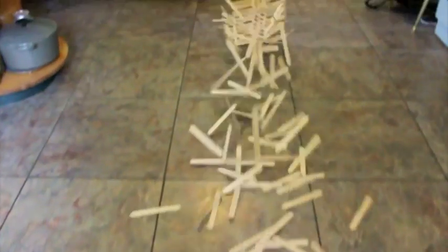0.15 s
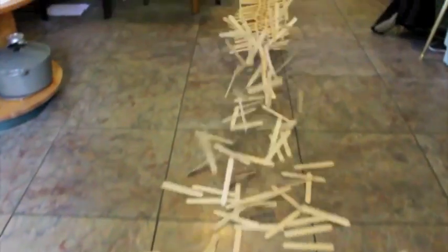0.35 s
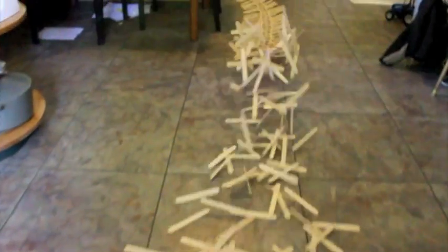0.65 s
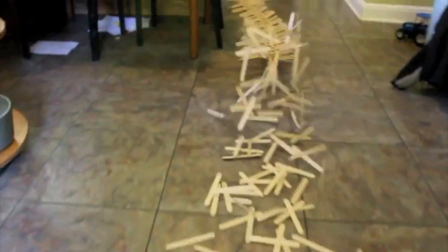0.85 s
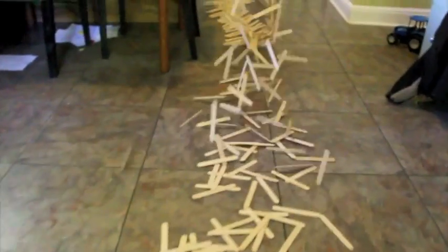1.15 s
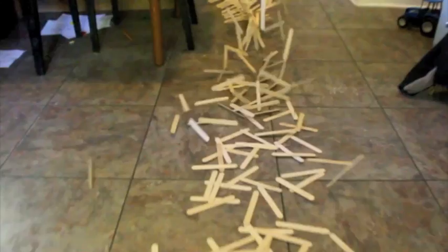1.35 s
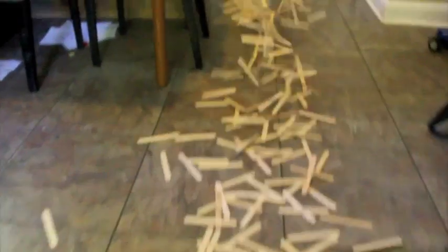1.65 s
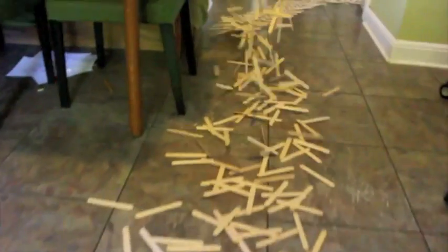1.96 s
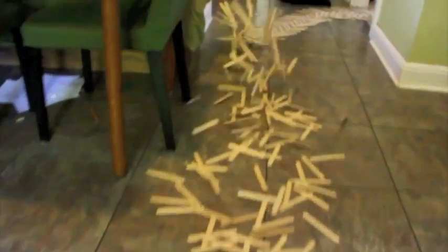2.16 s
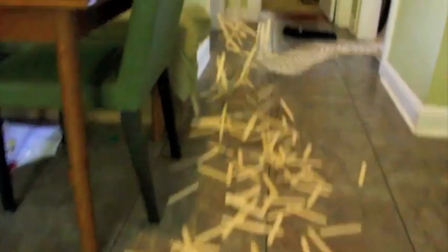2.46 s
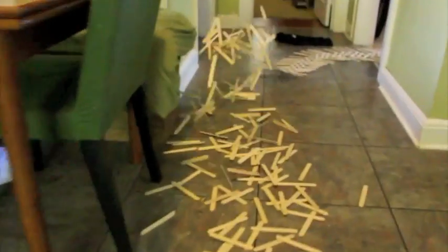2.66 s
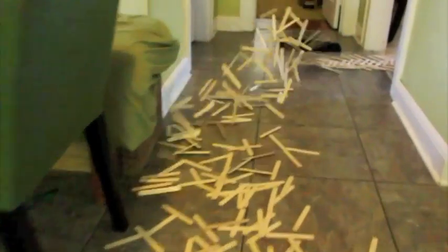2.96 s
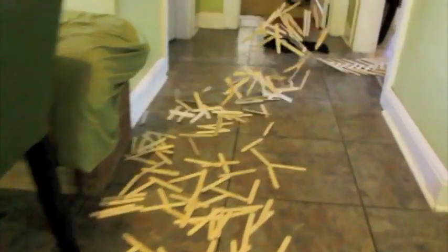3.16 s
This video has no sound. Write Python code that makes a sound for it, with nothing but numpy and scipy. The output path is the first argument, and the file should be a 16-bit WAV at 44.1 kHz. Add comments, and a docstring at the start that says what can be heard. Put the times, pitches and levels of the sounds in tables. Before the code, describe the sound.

A chain of thin wooden sticks bursts apart, rattling sharply across an indoor tiled floor

```python
"""Wooden sticks clattering on tile

A woven chain of wooden craft sticks springs apart along a tiled floor; the sticks rain down and clatter.
Flurries of bright wood-on-tile ticks and duller stick-on-stick knocks are filtered random contacts;
the loudest landings and flat slaps are placed one by one as short swelling rings.
A hard room blurs them all, and the walking camera picks up soft low thuds, made of wavering sines."""
import sys
import numpy as np
from scipy import signal
from scipy.fft import rfft, irfft, next_fast_len
from scipy.io import wavfile
from scipy.ndimage import map_coordinates

SR = 44100
rng = np.random.default_rng(int(sys.argv[2]) if len(sys.argv) > 2 else 0)


def materialize(psi):
    """Save the field psi as 16-bit PCM at rate SR to the path in sys.argv[1].

    A 1-D psi becomes a single channel; in a 2-D psi each row is a channel.
    """
    bounded = np.clip(np.atleast_2d(psi).T, -1, 1)
    quanta = np.round(bounded * 32767).astype(np.int16)
    wavfile.write(sys.argv[1], SR, quanta)


N = 146412  # length in samples


def amp(db):
    """Turn dB into an amplitude gain."""
    return 10 ** (np.asarray(db) / 20)


def unit(x):
    """Scale to rms 1."""
    return x / np.sqrt(np.mean(x ** 2) + 1e-20)


def along(points, hz):
    """Read (Hz, value) points at the frequencies hz, on a log axis."""
    point_hz, value = np.transpose(points)
    return np.interp(np.log(hz + 1), np.log(point_hz + 1), value)


def curve(rows):
    """Draw straight lines through (s, value) rows, one value per sample."""
    s, value = np.transpose(rows)
    return np.interp(np.arange(N) / SR, s, value)


def wobble(rate):
    """A smooth random curve with `rate` random knots a second."""
    knots = rng.standard_normal(400)
    return map_coordinates(knots, [np.arange(N) * rate / SR])


def coloured(x, spectrum):
    """Filter x to the given (Hz, dB) gain with minimum phase, so nothing sounds ahead of a contact."""
    m = next_fast_len(N + SR // 2) // 2 * 2
    gain = amp(along(spectrum, np.fft.rfftfreq(m, 1 / SR)))
    # folding the cepstrum onto positive time makes the filter causal
    cepstrum = irfft(np.log(gain), m)
    cepstrum[1:m // 2] *= 2
    cepstrum[m // 2 + 1:] = 0
    response = np.exp(rfft(cepstrum))
    return irfft(rfft(x, m) * response, m)[:N]


def place(s, waves):
    """Add one row of waves at each start time in s (a column, in seconds)."""
    size = waves.shape[1]
    at = np.round(s * SR).astype(int).clip(0, N) + np.arange(size)
    return np.bincount(at.ravel(), waves.ravel(), N + size + 1)[:N]


def rings(s, db, hz, life_s, rise_s, size):
    """One damped sine per contact: a quick rise, then exponential decay."""
    t = np.arange(size) / SR
    decay = np.exp(-t / life_s[:, None])
    rise = 1 - np.exp(-t / rise_s)
    waves = amp(db)[:, None] * np.sin(2 * np.pi * hz[:, None] * t) * decay * rise
    return place(s[:, None], waves)


def rain(count, top_hz, life_s, spread_db, cap_db, crack, size):
    """Random contacts: each a short ring of random pitch and life, with a one-sample crack."""
    u = rng.random((count, 5))
    s = u[:, 0] * N / SR
    # a wider spread makes a few contacts stand out, up to the cap
    db = np.minimum(-spread_db * np.log(1 - u[:, 1]), cap_db)
    hz = top_hz * u[:, 2]
    life = life_s * np.exp(1.45 * (u[:, 3] - .5))
    ring = unit(rings(s, db, hz, life, life_s * 0.087, size))
    polarity = np.sign(u[:, 4] - .5)
    snap = unit(np.bincount((s * SR).astype(int), amp(db) * polarity, N)[:N])
    return ring + crack * snap


def struck(rows, side_db, size=300):
    """Each contact swells and dies: a ring at its pitch with two weaker, slightly random neighbours."""
    s, db, hz, length = np.transpose(rows)[:, :, None]
    u = rng.standard_normal((len(s), 4))
    t = np.arange(size) / SR
    peak_s = length / 3  # from start to peak
    wave = np.sin(2 * np.pi * hz * t)
    for k, ratio in enumerate((.72, 1.3)):
        side_hz = hz * (ratio + 0.038 * u[:, k:k + 1])
        phase = 2 * u[:, k + 2:k + 3]
        wave += amp(side_db) * np.sin(2 * np.pi * side_hz * t + phase)
    # contacts shorter than 0.6 ms get a one-sample crack
    wave[:, size // 50] += 1.5 * (length[:, 0] < .0006)
    step = t / peak_s
    wave *= amp(db) * step * np.exp(1 - step)
    return place(s - peak_s, wave)


def room(x, wet_db):
    """Direct sound and a diffuse noise tail whose energy dies at its own speed at each frequency."""
    # decay time of the tail: (frequency [Hz], time to fall 60 dB [s])
    decay_times = [(300, 0.25), (2000, 0.54), (10000, 0.29)]
    # low cut that keeps the noise tail free of deep rumble: (frequency [Hz], gain [dB])
    tail_low_cut = [(20, -16), (60, -2), (150, 0)]
    late = np.pad(x, (160, 0))[:N]  # the tail starts 160 samples behind the direct sound
    hz, t, z = signal.stft(late, SR, nperseg=256)
    keep = amp(-120 * (t[1] - t[0]) / along(decay_times, hz))  # energy kept per frame
    power = np.array([signal.lfilter([1 - k], [1, -k], p) for k, p in zip(keep, np.abs(z) ** 2)])
    noise = signal.stft(rng.standard_normal(N), SR, nperseg=256)[2]
    noise = noise / np.sqrt(np.mean(np.abs(noise) ** 2))
    wet = signal.istft(np.sqrt(power) * noise, SR, nperseg=256)[1][:N]
    return x + amp(wet_db) * coloured(wet, tail_low_cut)


def ticks():
    """Wood on tile: a dense rain of tiny bright rings whose level curve shapes the flurries."""
    # flurries, ahead of a common trim: (time [s], level [dB])
    flurries = [(0.0, -18.5), (0.03, -20.5), (0.05, -17), (0.14, -24.5), (0.16, -14), (0.22, -14.5),
                (0.3, -22.5), (0.34, -19), (0.42, -22), (0.54, -15), (0.69, -20), (0.71, -15), (0.89, -27),
                (0.9, -21.5), (1.01, -16), (1.09, -18.5), (1.1, -10), (1.11, -20), (1.18, -24), (1.33, -20),
                (1.46, -21.5), (1.5, -14.5), (1.51, -27), (1.53, -18), (1.54, -24.5), (1.82, -18),
                (1.86, -19), (1.89, -20), (1.91, -16), (1.94, -21.5), (2.03, -25), (2.04, -16.5),
                (2.13, -20), (2.14, -31), (2.15, -23), (2.22, -22), (2.24, -29), (2.28, -25.5), (2.3, -16),
                (2.32, -25.5), (2.38, -19.5), (2.51, -20), (2.51, -20), (2.53, -20.5), (2.7, -20),
                (2.74, -15.5), (2.93, -23), (2.97, -14), (2.99, -22.5), (3.04, -26), (3.05, -10.5),
                (3.09, -16), (3.12, -22.5), (3.25, -20), (3.26, -18.5), (3.32, -17.5)]
    # brightness of wood on tile: (frequency [Hz], gain [dB])
    colour = [(100, -100), (1500, -19), (3000, -10), (4500, -10.5), (4900, -3.5), (6300, -1.5), (7400, -4),
              (9200, -14.5), (10100, -22), (11200, -47)]
    fall = rain(count=7000, top_hz=11780, life_s=0.00034, spread_db=3, cap_db=8, crack=1.0, size=160)
    dry = unit(coloured(fall, colour) * amp(2.6 * wobble(70)))
    return room(dry * amp(curve(flurries) - 6.5), wet_db=-1)


def knocks():
    """Stick on stick: longer rings under a duller filter, all of one strength."""
    # bursts of knocks, ahead of a common trim: (time [s], level [dB])
    bursts = [(0.0, -23.5), (0.02, -30), (0.12, -25.5), (0.13, -27), (0.17, -19.5), (0.25, -24),
              (0.28, -25.5), (0.54, -26.5), (0.69, -28.5), (0.74, -27), (0.86, -29.5), (1.11, -28),
              (1.22, -31.5), (1.31, -28), (1.56, -29.5), (1.85, -26), (1.89, -34), (1.91, -26),
              (1.93, -31.5), (2.03, -31), (2.1, -27.5), (2.24, -30), (2.51, -26), (2.7, -29), (2.73, -22),
              (2.9, -30.5), (3.04, -27.5), (3.065, -23), (3.11, -30), (3.32, -29.5)]
    # dull tone of stick on stick: (frequency [Hz], gain [dB])
    colour = [(30, -65), (300, -26), (720, -11.5), (1250, -8.5), (1550, -7), (1870, -2), (2060, -5),
              (3300, -5.5), (5000, -4), (9000, -43.5)]
    fall = rain(count=6000, top_hz=9020, life_s=0.001, spread_db=0.0, cap_db=14, crack=1.0, size=300)
    return unit(coloured(fall, colour)) * amp(curve(bursts) - 3.5 + 0.13 * wobble(20))


def rumble():
    """The heap's low wooden rumble: fewer, lower rings of uneven strength through a low filter."""
    # swells of the rumble, ahead of a common trim: (time [s], level [dB])
    swells = [(0.0, -45.5), (0.12, -40), (0.14, -45), (0.17, -36), (0.28, -41), (0.31, -34.5),
              (0.405, -41.5), (0.42, -51), (0.91, -43), (1.06, -41.5), (1.1, -48), (1.28, -50),
              (1.29, -34.5), (1.33, -53), (1.37, -42), (1.62, -45), (1.65, -40.5), (2.08, -51.5),
              (2.12, -40), (2.31, -45), (2.74, -40.5), (2.99, -45), (3.01, -40), (3.14, -50), (3.31, -49),
              (3.32, -52)]
    # low tone of the heap: (frequency [Hz], gain [dB])
    colour = [(15, -31), (50, -30), (100, -4), (270, -7.5), (320, -3.5), (550, -1.5), (900, 0.5),
              (2500, -28)]
    heap = rain(count=3000, top_hz=2700, life_s=0.001, spread_db=2.0, cap_db=16.5, crack=0.78, size=400)
    return unit(coloured(heap, colour)) * amp(curve(swells) - 2.5)


def landings():
    """The loudest single landings: very short, mostly high rings."""
    # ahead of the contact filter: (time of peak [s], level [dB], pitch [Hz], length [s])
    hits = [(0.0144, -11, 6270, 0.0005), (0.0565, -5, 5620, 0.0007), (0.0645, -5, 6960, 0.0005),
            (0.1066, -9, 5810, 0.001), (0.1183, -9, 6480, 0.0004), (0.16, -6, 6290, 0.0009),
            (0.1627, -9, 5250, 0.0009), (0.1699, -7, 5280, 0.0007), (0.1931, -7, 7430, 0.0005),
            (0.2197, -7, 6310, 0.0009), (0.2224, -6, 6370, 0.0015), (0.226, -6, 6160, 0.0012),
            (0.2301, -6, 5940, 0.0008), (0.2394, -5, 7360, 0.0004), (0.3224, -8, 6330, 0.0005),
            (0.3364, -6, 7540, 0.0005), (0.3366, -13, 9600, 0.001), (0.3472, -7, 6440, 0.0008),
            (0.3748, -8, 4440, 0.0006), (0.3826, -10, 6310, 0.0007), (0.4525, -10, 5120, 0.0006),
            (0.4887, -8, 5230, 0.0011), (0.4917, -8, 6240, 0.0008), (0.5003, -8, 4870, 0.0017),
            (0.5257, -7, 6610, 0.0019), (0.5319, -4, 6780, 0.0005), (0.553, -6, 7170, 0.0011),
            (0.5651, -4, 5730, 0.0006), (0.598, -7, 4890, 0.0009), (0.6056, -4, 5380, 0.0004),
            (0.704, -6, 7390, 0.0004), (0.7069, -8, 7150, 0.0011), (0.7553, -8, 4520, 0.0005),
            (0.7816, -6, 7690, 0.0005), (0.9088, -11, 5380, 0.0004), (0.9541, -10, 6800, 0.0005),
            (0.9593, -9, 6610, 0.0005), (0.9705, -8, 6090, 0.0004), (1.008, -7, 7260, 0.0004),
            (1.0117, -7, 6930, 0.0014), (1.0375, -8, 6800, 0.0007), (1.0512, -8, 5320, 0.001),
            (1.0979, -2, 6270, 0.0008), (1.1024, -8, 6420, 0.0005), (1.2444, -11, 6440, 0.0007),
            (1.3246, -10, 6440, 0.0008), (1.4213, -9, 6420, 0.0009), (1.4675, -8, 6800, 0.0006),
            (1.4841, -8, 5990, 0.001), (1.4918, -5, 6220, 0.0005), (1.4995, -9, 4760, 0.0007),
            (1.5316, -11, 6180, 0.0007), (1.5945, -16, 9400, 0.0008), (1.6085, -7, 6680, 0.0006),
            (1.7006, -11, 5840, 0.0006), (1.7225, -10, 5770, 0.0004), (1.7421, -10, 8600, 0.0005),
            (1.7845, -10, 6350, 0.0005), (1.7871, -9, 6030, 0.0006), (1.8582, -5, 5730, 0.0004),
            (1.8615, 0, 6300, 0.0009), (1.898, -10, 6010, 0.0006), (1.9111, 0, 4200, 0.0004),
            (1.9158, -8, 6590, 0.0005), (1.998, -8, 6350, 0.0005), (2.0478, -11, 6610, 0.0005),
            (2.107, -9, 5340, 0.0008), (2.1351, -6, 6900, 0.0012), (2.1352, -15, 9900, 0.0008),
            (2.1382, -6, 6720, 0.0012), (2.131, -10, 7000, 0.0008), (2.1697, -11, 6650, 0.0005),
            (2.1992, -9, 8010, 0.0008), (2.3, -10, 6680, 0.001), (2.3805, -9, 5600, 0.0005),
            (2.4288, -8, 6140, 0.0005), (2.4345, -8, 6290, 0.0006), (2.4469, -10, 6120, 0.0009),
            (2.5125, -4, 6630, 0.0006), (2.5147, -5, 6500, 0.0018), (2.5222, -5, 6200, 0.0004),
            (2.5556, -8, 7430, 0.0008), (2.6285, -10, 5200, 0.0015), (2.677, -10, 6300, 0.001),
            (2.6693, -11, 6760, 0.0011), (2.7105, -10, 6220, 0.0005), (2.729, -8, 6370, 0.0007),
            (2.7824, -8, 6400, 0.0005), (2.8331, -7, 7170, 0.0012), (2.8375, -14, 9500, 0.0008),
            (2.8384, -6, 5680, 0.0006), (2.8627, -10, 6630, 0.0014), (2.9611, -8, 5840, 0.0009),
            (2.9723, -8, 7450, 0.0009), (3.0492, -7, 6910, 0.0008), (3.0585, -4, 4410, 0.0004),
            (3.0752, -6, 6200, 0.0005), (3.0807, 2, 6740, 0.0006), (3.0852, 0, 6680, 0.0013),
            (3.1029, -6, 6400, 0.0012), (3.1157, -8, 7300, 0.0011), (3.1675, -7, 6830, 0.0014),
            (3.1834, -11, 5960, 0.0008), (3.2337, -11, 4780, 0.0007), (3.2626, -9, 5510, 0.0007),
            (3.2754, -5, 6910, 0.0004), (3.2855, -9, 6850, 0.0004), (3.3026, -6, 5250, 0.0009)]
    return struck(hits, side_db=-7)


def slaps():
    """The loudest flat slaps: lower rings that mostly last longer."""
    # ahead of the contact filter: (time of peak [s], level [dB], pitch [Hz], length [s])
    hits = [(0.1061, -16, 2560, 0.0019), (0.1546, -15, 1870, 0.0019), (0.1634, -11, 2840, 0.0014),
            (0.1749, -10, 2370, 0.0008), (0.1793, -9, 2710, 0.0009), (0.2078, -10, 2710, 0.0017),
            (0.195, -19, 1000, 0.004), (0.238, -17, 1100, 0.004), (0.2384, -11, 2540, 0.0016),
            (0.3749, -12, 1590, 0.0012), (0.3877, -14, 2860, 0.0016), (0.4546, -16, 2780, 0.0019),
            (0.5082, -15, 2820, 0.0011), (0.7241, -16, 2610, 0.0009), (0.7273, -16, 2630, 0.0008),
            (0.7561, -16, 1890, 0.0008), (1.05, -22, 633, 0.004), (1.2997, -16, 2860, 0.0008),
            (1.609, -16, 2710, 0.001), (1.8112, -14, 3080, 0.0009), (1.9112, -15, 1770, 0.0013),
            (2.12, -20, 953, 0.003), (2.1583, -18, 1790, 0.0009), (2.1989, -19, 2300, 0.0012),
            (2.2151, -15, 1770, 0.0008), (2.5214, -13, 1100, 0.002), (2.5715, -14, 1200, 0.002),
            (2.665, -22, 633, 0.004), (2.7244, -13, 2990, 0.0015), (2.79, -20, 950, 0.003),
            (2.937, -16, 2970, 0.0009), (2.9658, -16, 2220, 0.0009), (3.0532, -10, 1940, 0.001),
            (3.0603, -11, 2950, 0.0009), (3.0846, -11, 2860, 0.0017), (3.2351, -18, 2000, 0.0019)]
    return struck(hits, side_db=-8)


def loud_contacts():
    """Landings and slaps through one filter that trims both ends of the spectrum, in the room."""
    # tone of the loud contacts: (frequency [Hz], gain [dB])
    colour = [(30, -42), (400, -10), (1200, -4.5), (4000, -3), (8500, -3.5), (10100, -7), (11200, -26)]
    return room(coloured(landings() + slaps(), colour), wet_db=-7)


def thuds():
    """Soft low bumps through the moving camera's body: wavering swells with a rough overtone."""
    # bumps, the level ahead of its wavering: (start [s], level [dB], pitch [Hz], length [s])
    bumps = [(0.73, -41.5, 58.7, 0.15), (0.87, -39, 43.6, 0.19), (0.965, -49, 79.4, 0.15),
             (1.075, -55, 35, .14), (1.272, -49, 70, 0.053), (1.665, -45, 69.4, 0.084),
             (1.754, -50, 45, 0.083), (2.118, -52, 78, 0.071), (2.366, -45, 38.3, 0.13),
             (2.47, -44, 35, 0.07), (2.521, -45, 120.6, 0.079), (2.72, -43, 112, 0.11),
             (3.249, -52, 50, 0.099)]
    t, out = np.arange(N) / SR, np.zeros(N)
    for s, db, hz, length in bumps:
        swell = np.sin(np.pi * np.clip((t - s) / length, 0, 1)).clip(0) ** 1.1
        turn = 2 * np.pi * hz * (t - s) + 1.1 * wobble(35)  # the phase wanders
        overtone = 0.32 * wobble(60) * np.sin(2 * turn)
        out += amp(db + 1.55 * wobble(40.3)) * swell * (np.sin(turn) + overtone)
    return out


def scene():
    """All layers at one microphone; the thuds alone bypass the room."""
    stick_on_stick = room(knocks() + rumble(), wet_db=1)
    return (ticks() + stick_on_stick + loud_contacts() + thuds())[None]


def record(dry):
    """The loudest peaks saturate softly; the camera keeps nothing above its band limit."""
    ceiling, top_hz = .98, 11310
    soft = dry / (1 + np.abs(dry / ceiling) ** 4) ** (1 / 4)
    m = next_fast_len(N + SR // 2)
    in_band = np.fft.rfftfreq(m, 1 / SR) < top_hz
    return irfft(rfft(soft, m) * in_band, m)[..., :N]


dry = scene()
out = record(dry)
materialize(out)
```